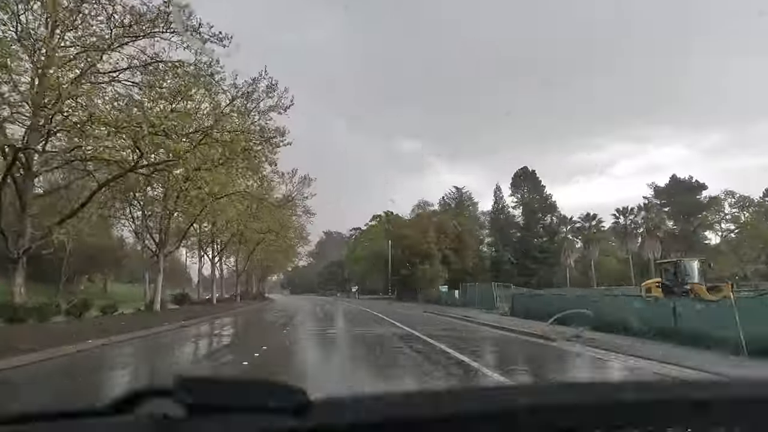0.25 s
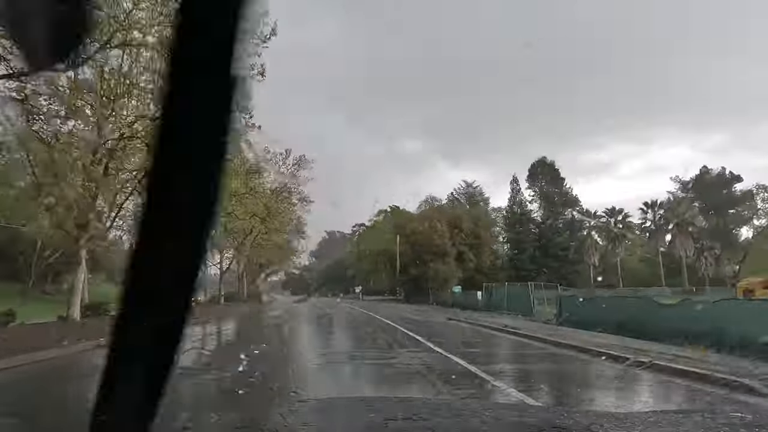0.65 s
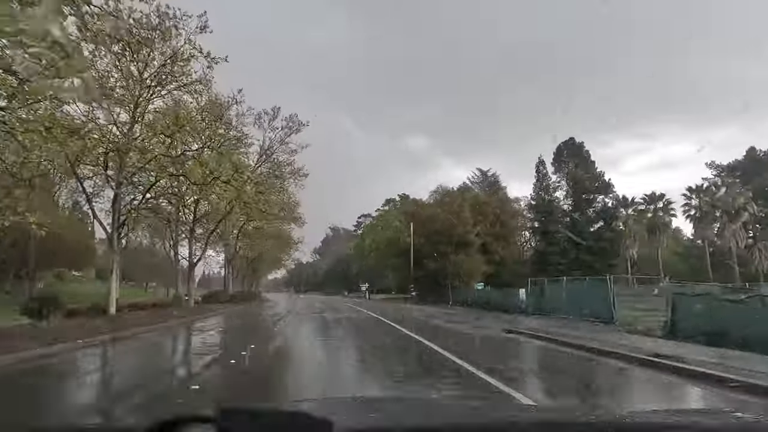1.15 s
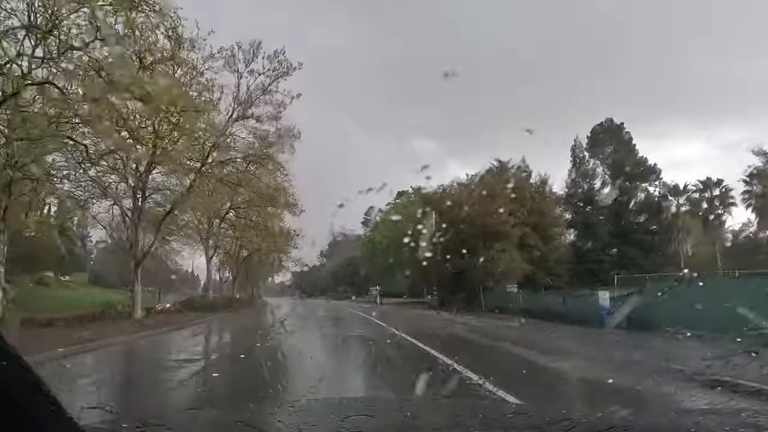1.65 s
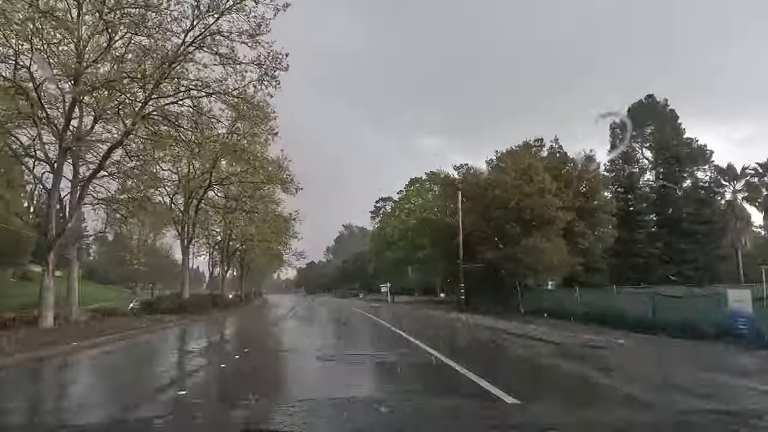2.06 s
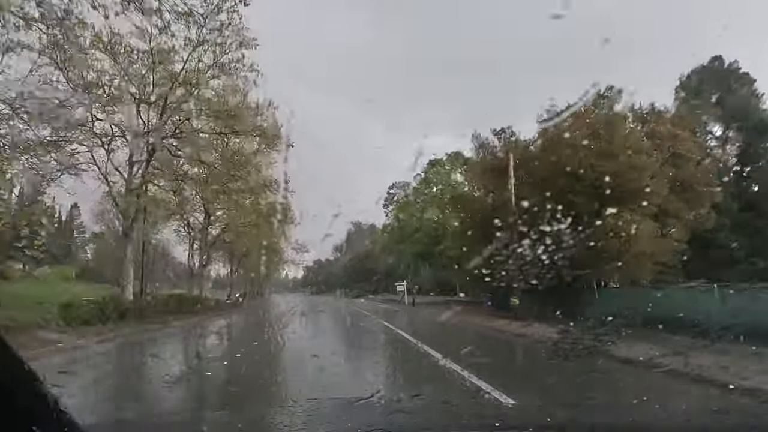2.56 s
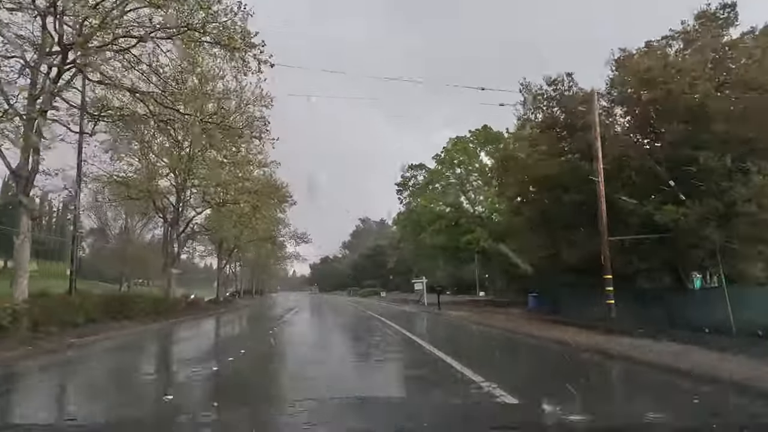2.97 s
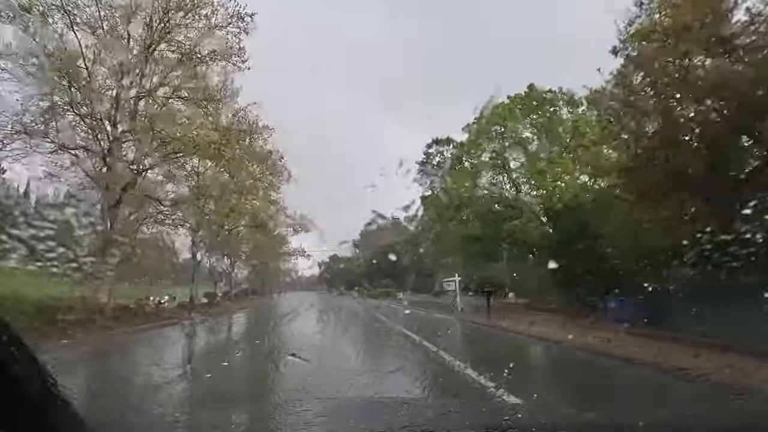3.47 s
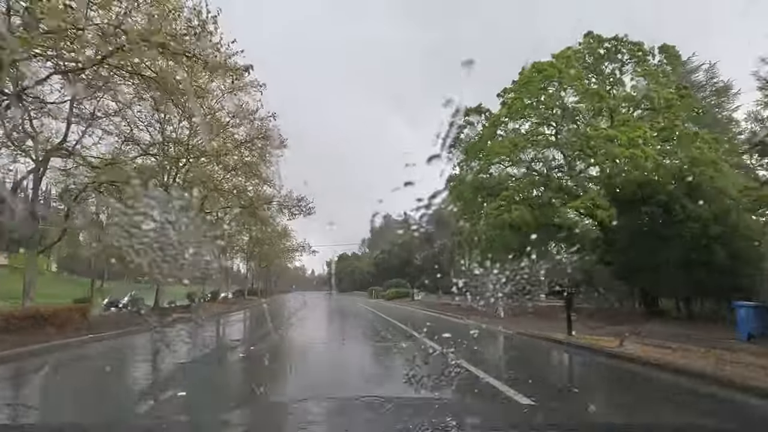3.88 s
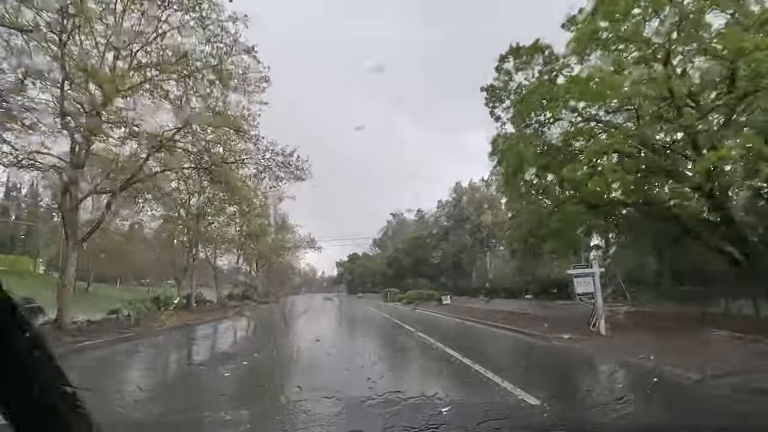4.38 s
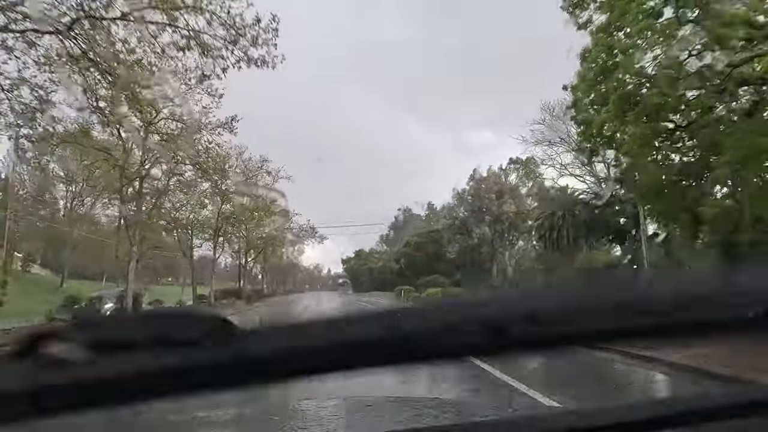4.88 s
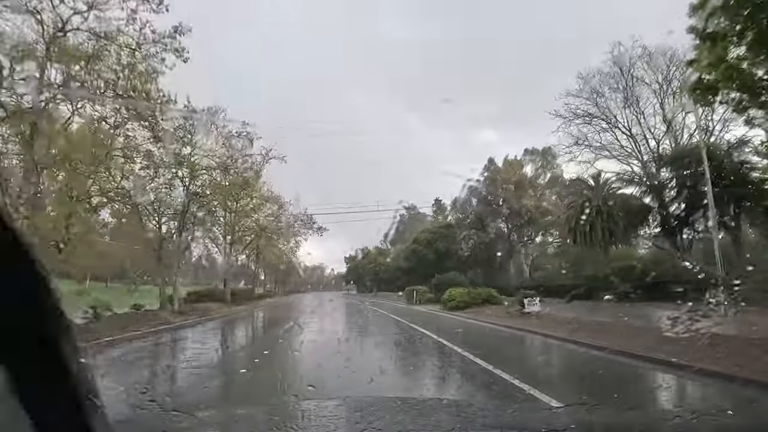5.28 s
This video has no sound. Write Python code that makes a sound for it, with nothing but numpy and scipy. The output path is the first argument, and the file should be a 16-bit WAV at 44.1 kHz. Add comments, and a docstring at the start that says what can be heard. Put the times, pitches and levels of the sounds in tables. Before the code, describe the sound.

Inside a closed car driving on a wet road, small hail patters densely on roof and windshield from start to end. Larger stones strike irregularly with dull knocks and bright ticks, thickest in the first second and a half and again in the last stretch. Fine spray hiss, low tyre roar, wavering cabin boom and soft floor thumps lie beneath. Close cabin microphone, mono, dry, with very short ringing.

```python
"""Hail drums on the roof and windscreen of a moving car, heard from inside.
Small stones patter densely and larger ones stand out, each a dull knock and a bright tick from a struck panel.
Spray hiss and road roar are shaped noise, coloured together with the hail by the cabin's resonances.
Wavering low tones make the cabin boom and a faint engine drone; decaying tones thump through the floor."""
import sys
import numpy as np
from scipy import signal
from scipy.fft import rfft, irfft
from scipy.io import wavfile
from scipy.ndimage import uniform_filter1d, minimum_filter1d

SR = 44100
rng = np.random.default_rng(int(sys.argv[2]) if len(sys.argv) > 2 else 0)


def makeup_ratio(level_db):
    """Linear amplitude ratio for a level in decibels (20 dB per factor of ten)."""
    decades = np.asarray(level_db, float) / 20
    return 10 ** decades


def unload_audio(sound):
    """Save the sound as a 16-bit wav file, at the path given as the first command line argument."""
    columns = np.transpose(np.atleast_2d(sound))
    # keep every value between -1 and 1, then stretch to whole-number steps
    steps = np.round(np.clip(columns, -1, 1) * 32767)
    wavfile.write(sys.argv[1], SR, steps.astype(np.int16))


N = 243873

# level of the small hail as heard, dipping after some booms, also steering middling stones and spray:
# (time [s], level [dB])
PATTER = [(0.0, -32), (0.4, -33.5), (0.75, -29.5), (0.93, -34), (1.02, -30.5), (1.07, -32), (1.42, -30.5),
          (1.78, -36), (1.88, -42), (1.96, -35.5), (2.15, -37), (2.45, -34), (2.68, -30), (2.9, -33.5),
          (3.03, -35), (3.6, -33.5), (3.85, -34), (3.96, -30), (4.06, -33), (4.63, -32.5), (4.7, -32.5),
          (4.8, -34), (5.07, -31.5), (5.14, -38), (5.23, -32.5), (5.47, -37.5), (5.53, -28.5)]
# colour of struck glass and sheet metal heard inside: (frequency [Hz], density [dB per Hz])
PANEL = [(150, -34.5), (260, -5.5), (600, -6.5), (1400, -9.5), (2000, -9.5), (2800, -8), (3400, -12.5),
         (4200, -20), (5500, -22.5), (7300, -28.5), (9800, -38), (11300, -43.5), (12700, -40.5),
         (15700, -56)]


def evened(x):
    """Scales to rms 1."""
    return x / np.sqrt(np.mean(x ** 2) + 1e-20)


def read(points, hz):
    """Reads a spectrum table with straight lines over log frequency."""
    f, value = np.transpose(points)
    return np.interp(np.log(hz + 1), np.log(f + 1), value)


def follow(rows):
    """Draws the columns of a time table as curves, one value per sample."""
    s, *columns = np.transpose(rows)
    return [np.interp(np.arange(N) / SR, s, c) for c in columns]


def drift(rate_hz):
    """Slow random movement of rms 1, fading out above rate_hz."""
    hz = np.fft.rfftfreq(N, 1 / SR)
    spectrum = rfft(rng.standard_normal(N)) / (1 + (hz / rate_hz) ** 4)
    return evened(irfft(spectrum, N))


def fuzzy_tone(hz, width_hz, steady):
    """A tone of about rms 1: a steady part plus a part that wavers like narrow noise."""
    steady = np.clip(steady, 0, 1)
    waver = (drift(width_hz) + 1j * drift(width_hz)) / np.sqrt(2)
    cycles = np.cumsum(np.full(N, hz)) / SR + rng.random()
    envelope = steady + np.sqrt(1 - steady ** 2) * waver
    return np.sqrt(2) * (np.exp(2j * np.pi * cycles) * envelope).real


def causal(db, size):
    """Minimum-phase impulse response: the given colour with its energy as early as possible."""
    mirrored_db = np.r_[db, db[-2:0:-1]]
    log_gain = np.log(makeup_ratio(np.maximum(mirrored_db, -100)))
    return np.fft.ifft(np.exp(np.conj(signal.hilbert(log_gain)))).real[:size]


def patches(count, size):
    """Each spot on roof or glass gives a sharp crack and a dense short ring, split into knock and tick."""
    # how long panels and cabin ring: (frequency [Hz], typical time to fall 60 dB [s])
    ring_times = [(300, 0.052), (1000, 0.063), (3000, 0.063), (6000, 0.053), (14000, 0.059)]
    split_hz = 5000
    hz = np.fft.rfftfreq(size, 1 / SR)
    # noise that dies away at its own pace in every band
    bins, t, z = signal.stft(rng.standard_normal((count, size)), SR, nperseg=128)
    spot_spread = makeup_ratio(1.3 * rng.standard_normal((count, 1, 1)))
    t60 = read(ring_times, bins)[:, None] * spot_spread
    decaying = z * makeup_ratio(-60 * t / t60) / np.sqrt(t60 * SR)
    rings = signal.istft(decaying, SR, nperseg=128)[1][:, :size]
    rings /= np.linalg.norm(rings, axis=1, keepdims=True)
    high_pass = signal.butter(3, split_hz, "high", fs=SR, output="sos")
    low_pass = signal.butter(3, split_hz, fs=SR, output="sos")
    knocks, ticks = [], []
    for ring in rings:
        # this spot's own colour and sparkle
        colour_db = 2.43 * evened(uniform_filter1d(rng.standard_normal(len(hz)), size=60))
        sparkle_db = 4.5 * rng.standard_normal() * (hz / 12000) ** 2
        crack = causal(read(PANEL, hz) + colour_db + sparkle_db, size)
        tail = signal.fftconvolve(ring, crack)[:size]
        # the treble holds more of the direct crack
        ticks.append(signal.sosfilt(high_pass, makeup_ratio(-3.0) * crack + tail))
        knocks.append(signal.sosfilt(low_pass, makeup_ratio(-3.5) * crack + tail))
    return np.array(knocks), np.array(ticks)


def small_hail(knocks, ticks):
    """Dense random small stones in gusts; harder blows sound brighter."""
    stones_per_s, size_spread_db = 1500, 4.5
    gust = makeup_ratio(1.5 * drift(12))
    falls = rng.random(N) < stones_per_s / SR * gust / gust.mean()
    blow_db = size_spread_db * np.minimum(rng.exponential(1, N), 3.5) * falls
    sign = rng.choice([-1., 1.], N) * falls
    spot = rng.integers(0, len(knocks), N)
    out = np.zeros(N)
    for k, (knock, tick) in enumerate(zip(knocks, ticks)):
        here = sign * (spot == k)
        out += signal.oaconvolve(here * makeup_ratio(blow_db), knock)[:N]
        # the tick grows faster than the knock
        out += signal.oaconvolve(here * makeup_ratio(1.24 * blow_db - 3.5), tick)[:N]
    return makeup_ratio(follow(PATTER)[0]) * evened(out)


def large_hail(knocks, ticks):
    """Single blows over the patter: mostly loud ones at set times, middling ones at random."""
    # single stones at set times, most of them loud:
    # (time [s], peak of the dull knock [dB], peak of the bright tick [dB])
    set_stones = [(0.1541, -17, -24), (0.2614, -15, -29), (0.3102, -20, -27), (0.3708, -33, -22),
                  (0.4621, -27, -23), (0.4864, -15, -20), (0.554, -17, -44), (0.7071, -21, -27),
                  (0.7286, -13, -30), (0.836, -19, -29), (0.8705, -19, -19), (0.9481, -21, -27),
                  (0.9924, -14, -26), (1.0132, -15, -38), (1.073, -14, -45), (1.304, -36, -21),
                  (1.3185, -25, -33), (1.3942, -18, -28), (1.403, -25, -27), (1.4231, -16, -40),
                  (1.4632, -17, -40), (1.5681, -21, -35), (1.6247, -17, -44), (2.2038, -29, -41),
                  (2.4299, -19, -44), (2.5338, -29, -41), (2.5737, -39, -29), (2.5901, -22, -28),
                  (2.617, -20, -31), (2.6833, -15.5, -35), (2.8239, -17, -44), (2.9849, -20, -27),
                  (3.0856, -19, -33), (3.1426, -19, -31), (3.2379, -21, -43), (3.5584, -24, -31),
                  (3.6892, -14.5, -32), (3.7567, -19, -44), (3.8286, -28, -33), (3.909, -17, -22),
                  (3.9911, -17, -33), (4.0235, -20, -26), (4.146, -17, -22.5), (4.2934, -18.5, -40.5),
                  (4.519, -10.5, -25), (4.6556, -13.5, -22), (4.7194, -22, -23.5), (4.744, -18.5, -35),
                  (4.8778, -20.5, -29), (4.919, -19, -26.5), (4.9531, -17.5, -26), (5.026, -15, -26),
                  (5.0859, -13.5, -27), (5.1584, -20.5, -30), (5.1928, -15.5, -40), (5.2338, -12, -39.5),
                  (5.3143, -13, -26), (5.3518, -18.5, -40), (5.4128, -15.5, -41), (5.5106, -12.5, -21.5)]
    middling_per_s, spread_db = 22, 4.5
    over_patter_db = [6.5, -11.5]  # middling knock and tick peaks
    at = np.flatnonzero(rng.random(N) < middling_per_s / SR)
    # knock and tick vary separately from stone to stone
    vary_db = spread_db * rng.uniform(-1.8, 1.7, (len(at), 2))
    peak_db = follow(PATTER)[0][at, None] + vary_db + over_patter_db
    stones = np.r_[set_stones, np.c_[at / SR, peak_db]]
    spots = rng.integers(0, len(knocks), len(stones))
    out = np.zeros(N + knocks.shape[1])
    for (s, knock_db, tick_db), spot in zip(stones, spots):
        knock = knocks[spot] / abs(knocks[spot]).max()
        tick = ticks[spot] / abs(ticks[spot]).max()
        hit = makeup_ratio(knock_db) * knock + makeup_ratio(tick_db) * tick
        out[round(s * SR):][:len(hit)] += hit
    return out[:N]


def rain():
    """Fine rain and spray blur into a hiss through the same panels, duller at the top."""
    hz = np.fft.rfftfreq(N, 1 / SR)
    colour_db = read(PANEL, hz) - 4.3 * (hz / 8000) ** 2
    hiss = irfft(rfft(rng.standard_normal(N)) * makeup_ratio(colour_db), N)
    return makeup_ratio(follow(PATTER)[0] - 4.5) * evened(hiss)


def roar():
    """Low noise of tyres on a wet road: shaped noise on a moving level."""
    # road and spray level before a fixed lift: (time [s], level [dB])
    roar_level = [(0.0, -21.5), (0.21, -30.5), (1.35, -29.5), (1.43, -26.5), (1.79, -37), (1.82, -33),
                  (2.19, -37.5), (2.25, -30.5), (3.05, -31), (3.49, -34), (3.56, -30), (5.04, -30.5),
                  (5.24, -36.5), (5.33, -25), (5.48, -36), (5.53, -22.5)]
    # road and spray colour: (frequency [Hz], density [dB per Hz])
    roar_colour = [(11, -31), (18, -16.5), (38, -4.5), (54, -5), (91, -9), (128, -6), (231, -13.5),
                   (301, -13), (372, -22.5), (438, -22.5), (659, -31), (790, -26.5), (900, -39),
                   (1170, -34), (1980, -120)]
    hz = np.fft.rfftfreq(N, 1 / SR)
    noise = irfft(rfft(rng.standard_normal(N)) * makeup_ratio(read(roar_colour, hz)), N)
    return makeup_ratio(follow(roar_level)[0] + 4.0) * evened(noise)


def cabin(x):
    """Lifts the air resonances of the closed cabin."""
    # cabin resonances: (frequency [Hz], width [Hz], lift [dB])
    resonances = [(442, 43, 3.5), (562, 41, 4.5), (815, 41, 5)]
    for hz, width_hz, db in resonances:
        peak = signal.lfilter(*signal.iirpeak(hz, hz / width_hz, SR), x)
        x = x + (makeup_ratio(db) - 1) * peak
    return x


def boom():
    """Two low cabin modes swell and waver as the body rides the road."""
    # cabin boom: (time [s], lower mode level [dB], upper mode level [dB])
    boom_levels = [(0.0, -26, -27.5), (0.44, -28.5, -20), (0.55, -20, -23.5), (1.2, -28.5, -28),
                   (1.22, -29, -37), (1.62, -17.5, -14.5), (1.69, -14, -26), (1.79, -22, -16),
                   (1.86, -24, -39), (2.15, -37.5, -28), (2.71, -25, -17), (2.97, -30, -19),
                   (3.13, -10.5, -22.5), (3.25, -23, -13.5), (3.43, -29, -35), (3.7, -29.5, -22.5),
                   (4.0, -16.5, -33), (4.33, -33, -26), (4.59, -24, -18.5), (4.67, -28, -36),
                   (4.71, -28, -19), (5.01, -20, -29.5), (5.08, -20, -10.5), (5.16, -29, -47),
                   (5.24, -20.5, -14.5), (5.53, -28, -38)]
    low_db, high_db = follow(boom_levels)
    low = makeup_ratio(low_db) * fuzzy_tone(31.3, width_hz=7.8, steady=0.79)
    high = makeup_ratio(high_db) * fuzzy_tone(45.7, width_hz=8.4, steady=0.71)
    return low + high


def thumps():
    """The floor pan swells quickly and dies away at each tyre bump, over its own faint hum."""
    # tyre thumps through the floor: (time of the peak [s], level at the peak [dB], frequency [Hz])
    bumps = [(0.03, -22, 179.6), (0.11, -18.5, 112), (1.0, -20.5, 109.4), (1.41, -16, 78.1),
             (1.48, -16, 92.4), (1.57, -22.5, 99.3), (1.69, -21, 69.2), (1.91, -26, 68.8), (2.29, -33, 100),
             (2.78, -23, 105), (2.86, -23, 88.6), (2.97, -25, 70), (3.43, -28, 76.5), (3.69, -22.5, 104.3),
             (3.88, -23.5, 68.4), (4.24, -26.5, 67.9), (4.52, -23.5, 95), (5.41, -25.5, 120.5)]
    rise_s, t60_s = 0.021, 0.29
    t = np.arange(N) / SR
    out = makeup_ratio(-33.5) * fuzzy_tone(70, width_hz=13.6, steady=0.08)
    for s, db, hz in bumps:
        rise = np.exp(-((t - s) / rise_s) ** 2)
        decay = makeup_ratio(-60 * np.maximum(t - s, 0) / t60_s)
        shape = np.where(t < s, rise, decay)
        tone = np.cos(2 * np.pi * (hz * t + rng.random()))
        out += np.sqrt(2) * makeup_ratio(db) * shape * tone
    return out


def engine_drone():
    """A nearly steady engine tone with a fainter, fuzzier upper order."""
    # main engine tone: (time [s], level [dB])
    drone_level = [(0.0, -39), (0.03, -37), (1.43, -27), (1.56, -36.5), (2.83, -31.5), (3.53, -51),
                   (3.68, -28.5), (3.88, -35.5), (5.48, -26), (5.53, -41)]
    main = fuzzy_tone(129.6, width_hz=1.12, steady=0.98)
    upper = makeup_ratio(-8.5) * fuzzy_tone(193, width_hz=6.2, steady=0.23)
    return makeup_ratio(follow(drone_level)[0]) * (main + upper)


def scene():
    """Hail, spray and road pass through the cabin resonances; the low tones join them in one channel."""
    knocks, ticks = patches(count=40, size=4096)
    hail = small_hail(knocks, ticks) + large_hail(knocks, ticks)
    inside = cabin(hail + rain() + roar())
    return (inside + boom() + thumps() + engine_drone())[None]


def roll_off(x):
    """The treble ends steeply here."""
    return signal.sosfilt(signal.butter(12, 15730, fs=SR, output="sos"), x)


def record(dry):
    """A limiter with smoothed gain holds the loudest peaks down towards 0.5."""
    top = -minimum_filter1d(-abs(dry), size=441)  # highest peak within a 10 ms window
    gain = uniform_filter1d(np.minimum(1, 0.5 / top), size=221)
    return roll_off(dry * gain)


dry = scene()
out = record(dry)
unload_audio(out)
```